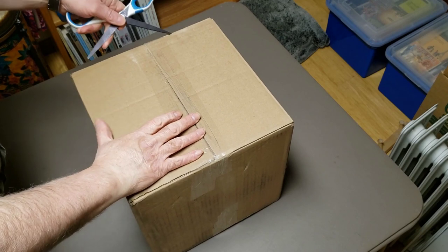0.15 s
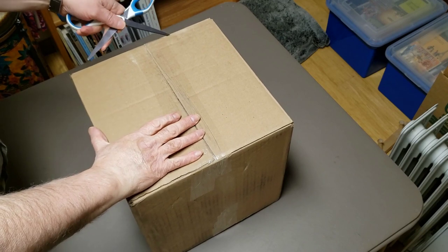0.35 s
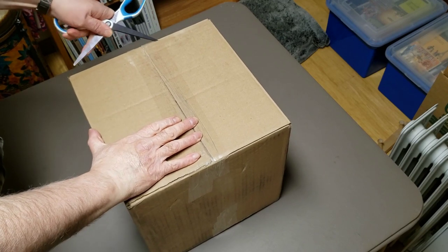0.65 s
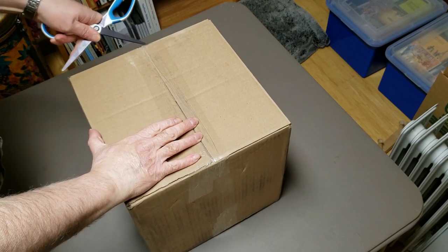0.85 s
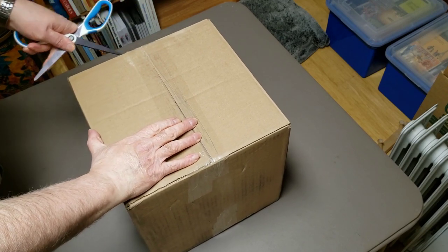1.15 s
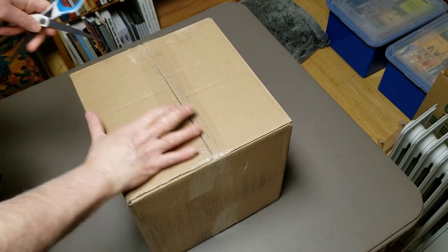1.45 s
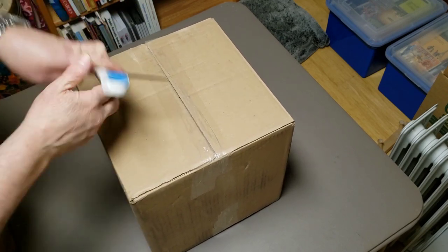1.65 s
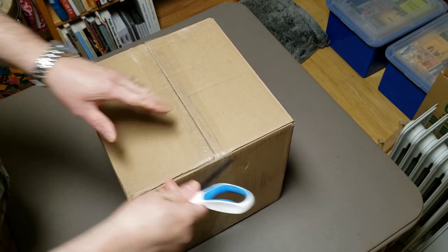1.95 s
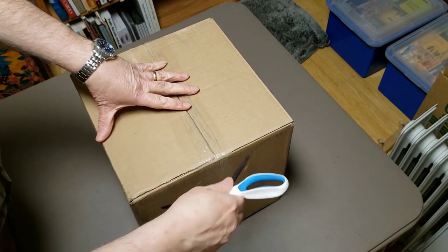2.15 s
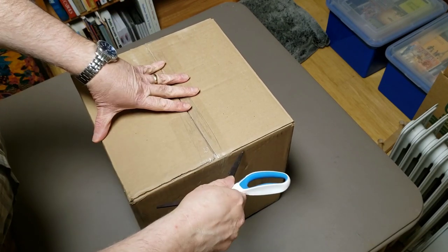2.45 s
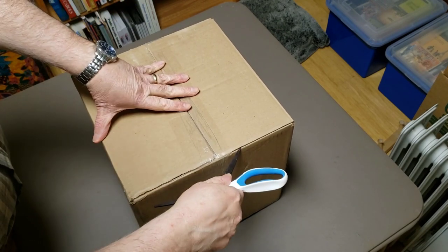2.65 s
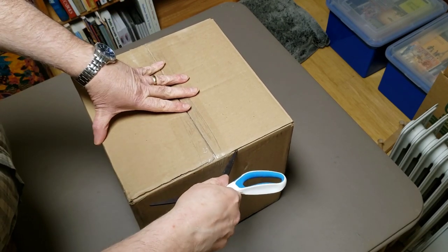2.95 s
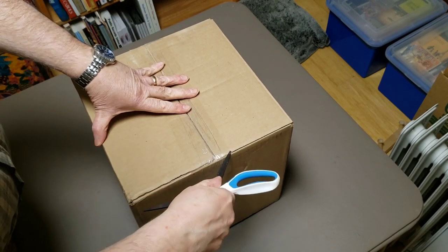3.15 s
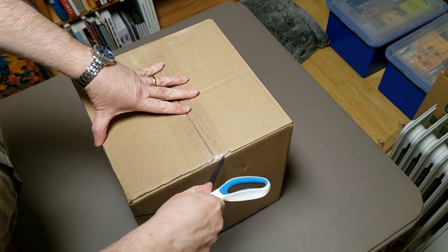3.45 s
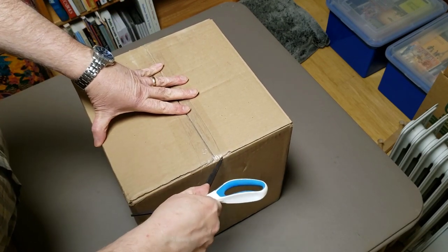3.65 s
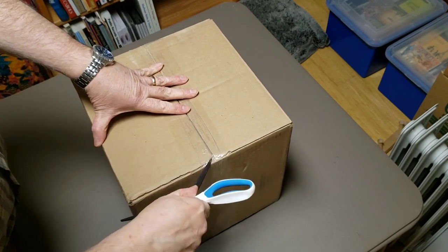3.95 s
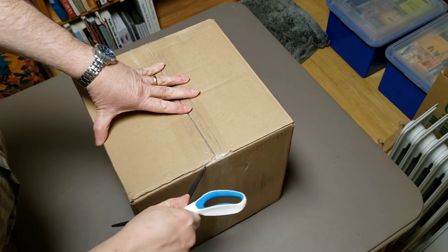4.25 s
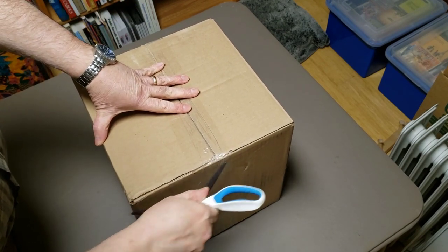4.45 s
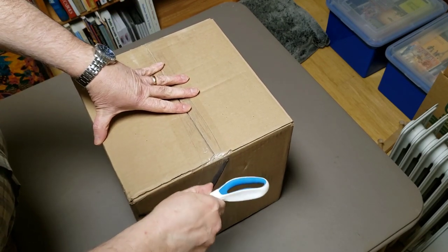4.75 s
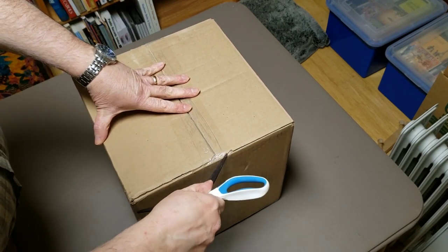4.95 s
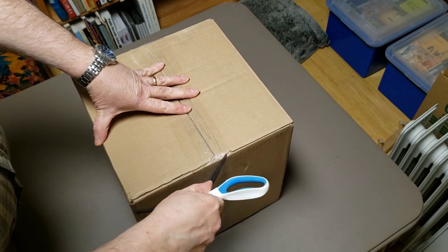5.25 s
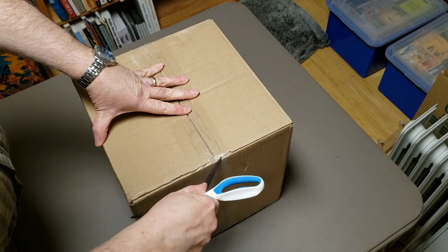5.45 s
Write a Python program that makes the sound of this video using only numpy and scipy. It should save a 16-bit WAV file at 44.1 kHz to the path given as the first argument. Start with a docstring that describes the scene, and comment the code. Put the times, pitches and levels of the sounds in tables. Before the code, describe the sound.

Soft rubbing on a carton comes first, then a dense second of dry scraping, crackling tape and hollow knocks. A bright metal scissor tick follows, and a few small rattles as hands change position. Afterwards come sparser, mostly quieter scrapes and low bumps against the front wall, a stronger thud midway, and a final crack. Near stereo microphones, short indoor reflections, light hiss.

```python
"""Soft rubbing on a cardboard box over room hiss comes first; then a scissor blade slits the box's tape.
The tape rips and snaps and the blade scrapes the board: uneven noise impulses ring tape, fibres and flaps.
Pushes, knocks and a slap of the hand make the hollow walls boom and the box rock, through sets of resonances.
The loose scissor halves tick and rattle, and a small furnished room answers all of it in stereo."""
import sys
import numpy as np
from scipy import signal
from scipy.fft import rfft, irfft, next_fast_len
from scipy.io import wavfile
from scipy.ndimage import uniform_filter1d, map_coordinates

SR = 44100
rng = np.random.default_rng(int(sys.argv[2]) if len(sys.argv) > 2 else 0)


def digitize_waveform(pressure):
    """Quantize a signal to 16-bit integers and store it at the path in sys.argv[1].

    Rows of a 2-D input are taken as channels; values are limited to [-1, 1].
    """
    field = np.atleast_2d(pressure).T
    bounded = np.clip(field, -1, 1)
    quanta = np.round(bounded * 32767).astype(np.int16)
    wavfile.write(sys.argv[1], SR, quanta)


def magnitude_from_level(level_db):
    """Linear magnitude for a level in decibels (20 dB per decade)."""
    exponent = np.asarray(level_db, float) / 20
    return 10 ** exponent


N = 247401


def unit(x):
    """Scaled to rms 1."""
    return x / np.sqrt(np.mean(x ** 2) + 1e-20)


def along(points, hz, column=1):
    """A column of (frequency, value, ..) points, interpolated on a log frequency axis."""
    table = np.transpose(points)
    return np.interp(np.log(hz + 1), np.log(table[0] + 1), table[column])


def filtered(x, response):
    """x times a complex response of frequency."""
    size = next_fast_len(N + SR // 2)  # spare room so that tails do not wrap round
    spectrum = rfft(x, size) * response(np.fft.rfftfreq(size, 1 / SR))
    return irfft(spectrum, size)[..., :N]


def modes(table):
    """Causal response of a set of resonances, each a damped mass on a spring."""
    def response(hz):
        total = 0
        for k, (centre, width, db) in enumerate(table):
            damping = 1j * hz * width
            resonance = damping / (centre ** 2 - hz ** 2 + damping)
            total = total + (-1) ** k * magnitude_from_level(db) * resonance  # neighbours swing in opposite phase
        return total
    return response


def causal(spectrum):
    """Minimum-phase response of (frequency, level) points, so that clicks do not ring early."""
    def response(hz):
        cepstrum = irfft(np.log(magnitude_from_level(along(spectrum, hz)) + 1e-6))
        half = len(cepstrum) // 2
        cepstrum[1:half] *= 2  # fold the early half onto the late half
        cepstrum[half + 1:] = 0
        return np.exp(rfft(cepstrum))
    return response


def scaled(response, force, gain):
    """The force, shaped in time by gain, rings the body; a steady force comes out at rms 1."""
    return filtered(force * gain, response) / filtered(force, response).std()


def pair(a, b, alike):
    """Left and right as sum and difference of two unrelated sounds, mixed to the given likeness."""
    def mid_side(hz):
        turn = np.arccos(np.clip(along(alike, hz), -1, 1)) / 2
        return np.array([np.cos(turn), np.sin(turn)])
    mid, side = filtered(np.array([a, b]), mid_side)
    return np.array([mid + side, mid - side])


# hiss spectrum: (frequency [Hz], level per Hz [dB])
HISS_COLOUR = [(15, -41), (25, 12), (111, 6), (457, 0), (510, 0), (584, -2.5), (1120, -6), (1320, -6),
               (1430, -6), (2980, -9.5), (9580, -22), (14800, -6), (16500, -28)]
# left-right likeness of the hiss: (frequency [Hz], likeness [-1..1])
HISS_LIKENESS = [(60, 0.41), (240, 0.37), (950, 0.049), (3770, -0.046), (15000, 0.26)]


def hiss():
    """Steady air and microphone noise: coloured random noise, partly shared by left and right."""
    noise = filtered(rng.standard_normal((2, N)), lambda hz: magnitude_from_level(along(HISS_COLOUR, hz)))
    return magnitude_from_level(-66.5) * unit(pair(*noise, HISS_LIKENESS))


# room echo: (frequency [Hz], time to fall 60 dB [s], level [dB])
ROOM_ECHO = [(99, 0.17, -12.5), (497, 0.21, -6), (1510, 0.32, -8), (3980, 0.28, -9), (9430, 0.27, -5.5),
             (14530, 0.32, -6)]


def room(x):
    """Diffuse answer of the room, unlike in each ear; the tail is redrawn at random every quarter second."""
    out, step = np.zeros((2, N + SR)), SR // 4
    for start in range(0, N, step):
        hz, t, z = signal.stft(rng.standard_normal((2, SR // 2)), SR, nperseg=256)
        decay = magnitude_from_level(-60 * t / along(ROOM_ECHO, hz)[:, None])
        tail = signal.istft(z * decay, SR, nperseg=256)[1][:, :SR // 2]
        tail = tail / np.linalg.norm(tail[0])
        wet = signal.fftconvolve(x[None, start:start + step], tail, axes=1)
        out[:, start + 250:][:, :wet.shape[1]] += wet  # first walls answer after 6 ms
    return filtered(out[:, :N], lambda hz: magnitude_from_level(along(ROOM_ECHO, hz, column=2)))


def scattered(x):
    """The sound by a few ms of other paths over box and table, redrawn at random every twentieth of a second."""
    out, step, t = np.zeros(N + SR), SR // 20, np.arange(256) / SR
    for start in range(0, N, step):
        paths = rng.standard_normal(len(t)) * magnitude_from_level(-60 * t / 0.0023)
        heard = np.convolve(x[start:start + step], paths / np.linalg.norm(paths))
        out[start:][:len(heard)] += heard
    return out[:N]


# ticks of the scissor halves, and bright clicks as the hand slaps the box:
# (time [s], level [dB], rattle after it [dB])
BRIGHT_TICKS = [(0.2208, -42.5, -5.5), (1.528, -20, -24.5), (1.5333, -28, -22), (1.536, -32, -28),
                (1.54, -39, -20), (1.5453, -32, -30), (1.553, -41, -18), (1.5645, -35, -27.5),
                (1.7704, -38, -5), (1.7756, -51, -9), (2.1684, -28.5, -9), (2.1757, -35.5, -4.5),
                (2.2044, -50, -21)]
# resonances a tick rings with: (frequency [Hz], width [Hz], level [dB])
TICK_MODES = [(4350, 3600, -9.5), (5980, 1300, -4), (9750, 1300, 0.5), (11730, 3150, -1), (15100, 1600, -9)]


def ticks():
    """A hard touch of about a millisecond, then a fine rattle, rings a set of treble resonances."""
    force, t = np.zeros(N), np.arange(SR // 5) / SR
    for s, db, rattle_db in BRIGHT_TICKS:
        contact = magnitude_from_level(5.5 - 60 * t / 0.0011)
        rattle = magnitude_from_level(rattle_db - 60 * t / 0.36)
        force[round(s * SR):][:len(t)] += magnitude_from_level(db) * (contact + rattle) * rng.standard_normal(len(t))
    return filtered(force, modes(TICK_MODES))


FRONT_S = 2.3  # from here on the blade works at the front wall


def pushed(table, s):
    """(frequency, width, level) of box modes for a push at time s: on the lid, later on the front wall."""
    return [(hz, width, front_db if s > FRONT_S else lid_db) for hz, width, lid_db, front_db in table]


def ringing(table, t):
    """Decaying sines of a struck body; each blow lands at a new spot, so the modes change strength."""
    total = 0
    for k, (hz, width, db) in enumerate(table):
        strength = (-1) ** k * magnitude_from_level(db + rng.normal(0, 3))
        total = total + strength * np.exp(-np.pi * width * t) * np.sin(2 * np.pi * hz * t)
    return total


# knocks on the box: (time [s], level [dB], flap ring [dB])
BOX_KNOCKS = [(0.451, -30, -7), (0.648, -38, -6), (0.69, -25.5, -7.5), (0.742, -22.5, -22),
              (0.823, -25, -17), (0.901, -32, -2), (1.156, -22.5, -3.5), (1.257, -27.5, -10),
              (1.281, -30, -23), (2.155, -42, -13), (2.166, -32, -24), (2.326, -41, -17), (2.623, -58, -23),
              (3.042, -30.5, -17), (3.415, -33, -21.5), (3.711, -43, -18), (3.739, -30, -17),
              (3.773, -22, -22), (3.851, -47.5, -10), (4.183, -48, -25), (4.657, -43.5, -10.5),
              (4.825, -48, 2.5), (4.998, -42, -23), (5.346, -45, -28), (5.435, -29, -25),
              (5.486, -33.5, -27), (5.54, -28, -29), (5.606, -27.5, -3)]
# slow modes of the loaded box on its table:
# (frequency [Hz], width [Hz], level for a lid push [dB], level for a front wall push [dB])
ROCK_MODES = [(46.8, 6.7, -9, -3), (64.7, 10.1, -6.5, 0.5), (87.8, 9.5, 1, -1.5), (124.6, 17, -11.5, -4),
              (151.7, 16.4, -4, -5.5)]
# wall modes of the hollow box:
# (frequency [Hz], width [Hz], level for a lid push [dB], level for a front wall push [dB])
WALL_MODES = [(192.3, 45, -5.5, -8), (230, 22, -2, 2), (263.5, 18.3, -4.5, -4), (292.7, 14.6, 0, -7.5),
              (356.4, 21.6, 0, -4), (369.8, 30.2, -4, -8), (429, 78, -6.5, -17.5), (502, 46, -8, -15),
              (570, 41, -10.5, -14)]
# flap resonances rung by the blade: (frequency [Hz], width [Hz], level [dB])
FLAP_MODES = [(729.8, 59, 1.5), (865, 93, -1), (973, 73, -3), (1054, 83, -2), (1138, 110, -3),
              (1288, 180, -5.5), (1502, 157, -6), (1760, 173, -8), (1980, 134, -17), (2350, 250, -15)]


def knocks():
    """Each blow rings walls and flaps and rocks the box through their decaying resonances."""
    out, t = np.zeros(N + SR), np.arange(SR // 3) / SR
    held = 0.37 + 1.4 * np.exp(-t / 0.0071)  # the hand on the box soon damps the first swings
    slow_start = 1 - np.exp(-t / 0.0023)  # the mass of the box is slow to start
    contact = 1 - np.exp(-t / 0.00041)
    for s, db, flap_db in BOX_KNOCKS:
        walls = held * ringing(pushed(WALL_MODES, s), t)
        rocking = magnitude_from_level(-5) * ringing(pushed(ROCK_MODES, s), t) * slow_start
        flaps = magnitude_from_level(flap_db) * ringing(FLAP_MODES, t)
        out[round(s * SR):][:len(t)] += magnitude_from_level(db - 4) * (walls + rocking + flaps) * contact
    return out[:N]


def slips(spread_db, clump_db, clumps):
    """Stick-slip force of rms 1: impulses of very uneven size that come in clumps (clumps a second)."""
    size_db = spread_db * rng.exponential(size=N)
    swell = map_coordinates(rng.standard_normal(N // 20), [np.arange(N) * min(clumps, 2000) / SR])
    return unit(rng.standard_normal(N) * magnitude_from_level(size_db + clump_db * swell))


def movements(sudden, rise_ms, gradual):
    """Sudden movements share one rise time; all in rows of one form."""
    return [(s, rise_ms, *rest) for s, *rest in sudden] + gradual


def effort(table, column, t60_s):
    """Gain per sample: each movement grows tenfold in its rise time, holds and fades; powers add."""
    t, power = np.arange(N) / SR, 0
    for row in table:
        s, rise_ms, hold_s = row[:3]
        early_ms = 1000 * np.maximum(s - t, 0)
        late_s = np.maximum(t - s - hold_s, 0)
        power = power + magnitude_from_level(2 * row[column]) * 1e-6 ** (early_ms / (3 * rise_ms) + late_s / t60_s)
    return np.sqrt(power)


def sticking(events, hold_s, depth_db):
    """The blade catches and its force eases just before each event."""
    t = np.arange(N) / SR
    ahead = np.array([row[0] for row in events] + [np.inf])
    wait = ahead[np.searchsorted(ahead, t)] - t
    return magnitude_from_level(-depth_db * np.exp(-wait / hold_s))


def shaken(table, force, gain):
    """Box modes under a force that moves from the lid to the front wall."""
    front = np.arange(N) > FRONT_S * SR
    lid_part = scaled(modes(pushed(table, 0)), force, gain * ~front)
    front_part = scaled(modes(pushed(table, N / SR)), force, gain * front)
    return lid_part + front_part


# sudden jolts of hand or blade on the box: (time [s], hold [s], walls [dB], rocking [dB])
BOX_JOLTS = [(0.452, 0.033, -44, -72), (0.655, 0.027, -44.5, -46), (0.692, 0.021, -38, -55),
             (0.745, 0.0375, -41.5, -33.5), (0.825, .03, -37, -31.5), (0.905, 0.085, -40, -37.5),
             (1.158, 0.047, -36.5, -30.5), (1.26, 0.024, -35, -31), (1.78, 0.028, -63, -74.5),
             (2.16, 0.041, -46, -49), (2.332, 0.0557, -62, -48), (2.625, 0.014, -72, -61.5),
             (3.235, 0.13, -48.5, -54.5), (3.415, 0.025, -44, -48.5), (3.712, 0.035, -43.5, -52),
             (4.185, 0.086, -59, -59), (4.658, 0.11, -57.5, -50.5), (4.827, 0.017, -47, -58),
             (5.0, 0.025, -57, -50), (5.347, 0.11, -57.5, -62), (5.435, 0.208, -46, -47.5)]
# the hand leans on the box or rubs it:
# (time of full strength [s], rise [ms], hold [s], walls [dB], rocking [dB])
HAND_LEANS = [(0.058, 82, 0.048, -64, -52), (0.221, 68, 0.027, -65.5, -67), (0.35, 32, 0.034, -72, -74),
              (0.417, 34, .01, -57, -55), (0.49, 49, 0.051, -39.5, -44.5), (0.997, 50, 0.12, -39.5, -35.5),
              (1.292, 40, 0.063, -35, -38.5), (1.411, 40, 0.062, -49, -54), (2.42, 30, 0.021, -62, -58),
              (2.494, 30, 0.023, -64.5, -65), (2.951, 54, 0.062, -53.5, -55.5),
              (3.042, 83, 0.087, -41, -47), (3.767, 40, 0.018, -32.5, -30.5), (3.834, 22, 0.0076, -59, -57),
              (3.936, 50, 0.021, -77, -60), (4.127, 65, .03, -66, -68), (4.35, 76, 0.022, -66, -62)]


def pushing():
    """Stick-slip pushes of hand and blade rock the box and shake its walls."""
    pushes = movements(BOX_JOLTS, 8, HAND_LEANS)  # jolts rise in 8 ms
    brace = sticking(BOX_KNOCKS, 0.028, depth_db=1.5)
    rock_force = slips(3.44, clump_db=0.5, clumps=55)
    wall_force = slips(2.65, clump_db=2.0, clumps=60)
    rock = shaken(ROCK_MODES, rock_force, effort(pushes, column=4, t60_s=0.3))
    walls = shaken(WALL_MODES, wall_force, effort(pushes, column=3, t60_s=0.22) * brace)
    return magnitude_from_level(-0.5) * (rock + walls)


def shifting(x, depth_db):
    """The contact point travels, so the colour of the scrape keeps changing in patches."""
    z = signal.stft(x, nperseg=256)[2]
    field = uniform_filter1d(rng.standard_normal(z.shape), size=3, axis=0)
    field = uniform_filter1d(field, size=14, axis=1)
    return unit(signal.istft(z * magnitude_from_level(depth_db * unit(field)), nperseg=256)[1][:N])


# tape snaps: (time [s], level [dB], fibre rasp [dB])
TAPE_SNAPS = [(0.413, -48, -18), (0.4464, -37, -9), (0.6514, -38, -14), (0.6883, -20, -7.5),
              (0.7397, -26, -1.5), (0.821, -20.5, -12.5), (0.9028, -22, -13), (0.9951, -29, -3.5),
              (1.1418, -22, -12.5), (1.1538, -26.5, -7.5), (1.254, -27, -5), (2.1655, -32, -4.5),
              (2.3226, -47, -14), (2.4952, -52, -9), (3.039, -35, -11), (3.0684, -35, -10),
              (3.2316, -45, -12), (3.71, -40.5, -10), (3.7399, -31, -11), (3.7614, -30.5, -21),
              (4.8234, -51, -6), (4.9926, -54, -10), (5.4321, -43.5, -4.5), (5.6064, -17.5, -17.5)]
# tape crackle as the microphone colours it: (frequency [Hz], level per Hz [dB])
TAPE_COLOUR = [(6500, -42.5), (8000, -15.5), (9000, -1.5), (10000, 3), (11700, 1), (13500, -6), (15600, -6),
               (16500, -92)]
# torn fibres as the microphone colours them: (frequency [Hz], level per Hz [dB])
FIBRE_COLOUR = [(1200, -18), (1900, -3), (2300, -6.5), (2900, -3), (3500, -3.5), (4300, -3), (5500, -5),
                (6800, -6.5), (7900, -15.5), (9500, -39.5)]


def snaps():
    """Tape lets go with a crack, then crackles as the tear runs on; fibres and flaps ring with it."""
    force, t = np.zeros((3, N + SR)), np.arange(SR // 5) / SR
    crack = magnitude_from_level(-60 * t / 0.0014)
    crackle = magnitude_from_level(-13 - 60 * t / 0.12)
    for s, db, rasp_db in TAPE_SNAPS:
        burst = (crack + crackle) * rng.standard_normal((3, len(t)))
        shares_db = np.array([[0], [rasp_db], [-3]])  # tape, fibres, flaps
        force[:, round(s * SR):][:, :len(t)] += magnitude_from_level(db + shares_db) * burst
    tape, fibres, flaps = force[:, :N]
    tape = magnitude_from_level(3) * filtered(tape, causal(TAPE_COLOUR))
    fibres = magnitude_from_level(12.5) * filtered(fibres, causal(FIBRE_COLOUR))
    return tape + fibres + magnitude_from_level(14) * filtered(flaps, modes(FLAP_MODES))


# sudden bites of the blade, and a slap of the hand on the lid:
# (time [s], hold [s], tape [dB], board [dB], fibres over board [dB])
BITES_AND_SLAP = [(0.415, .025, -58, -59.5, -6), (0.445, 0.0087, -55.5, -53.5, -10),
                  (0.656, 0.013, -49, -49.5, -2), (0.689, 0.011, -40, -38.5, -1.5),
                  (0.739, 0.033, -40, -38, -2), (0.818, 0.016, -43.5, -36, -2.5),
                  (0.9, 0.035, -42, -43.5, 0), (1.148, .01, -40.5, -48, -1), (1.156, .03, -39, -38.5, -1.5),
                  (1.252, 0.015, -37.5, -42, -2), (2.167, .04, -61.5, -54, 4),
                  (2.32, 0.019, -71, -69.5, -8), (2.447, 0.016, -76, -83, -4), (2.5, .03, -68, -81, -1),
                  (3.038, 0.019, -52, -54, -6.5), (3.229, .03, -53, -67.5, -2.5),
                  (3.708, 0.025, -52, -57, -0.5), (3.742, 0.034, -49, -45, -4),
                  (4.112, 0.049, -70, -75, -4), (4.167, 0.0206, -68.5, -79, 4),
                  (4.664, .012, -78, -69.5, -14), (4.995, 0.009, -72, -79, -7),
                  (5.432, 0.025, -56, -58, -6), (5.607, .012, -44, -39, -10)]
# slides of blade or hand over tape and board:
# (time of full strength [s], rise [ms], hold [s], tape [dB], board [dB])
BLADE_SLIDES = [(0.075, 115, 0.038, -61, -66), (0.137, 50, 0.033, -68, -70.5),
                (0.343, 22, 0.0081, -84, -69), (0.522, 116, 0.03, -52, -50.5), (0.597, 50, 0.037, -62, -58),
                (1.002, 150, 0.0088, -43, -42.5), (1.055, 44, 0.027, -44, -41),
                (1.303, 85, 0.05, -35.5, -32.5), (1.44, 27, 0.048, -54.5, -58),
                (3.085, 67, 0.031, -47.5, -51), (3.414, 105, 0.022, -60.5, -66),
                (4.288, 120, 0.061, -70, -75), (4.744, 25, 0.0224, -68.5, -74),
                (4.821, 28, 0.0051, -58, -62.5), (5.499, 76, 0.13, -61.5, -69.5),
                (5.582, 28, .02, -59, -62.5)]
BITE_RISE_MS = 4


def fibre_rasp():
    """Rows (time, rise, hold, level) of fibre rasp: sudden rows have their own share, slides follow the board."""
    rows = [(s, BITE_RISE_MS, hold_s, board_db + over_db)
            for s, hold_s, _, board_db, over_db in BITES_AND_SLAP]
    for s, rise_ms, hold_s, _, board_db in BLADE_SLIDES:
        over_db = -4.5 if s > FRONT_S else -2.5
        rows.append((s, rise_ms, hold_s, board_db + over_db))
    return rows


def cutting():
    """Blade and hand rasp on the flaps, fibres and tape, by stick-slip."""
    scraping = shifting(slips(2.374, clump_db=3.0, clumps=100), depth_db=3.5)
    tearing = shifting(slips(2.03, clump_db=2, clumps=150), depth_db=2.0)
    slides = movements(BITES_AND_SLAP, BITE_RISE_MS, BLADE_SLIDES)
    t60_s = 0.23  # how fast a movement dies away
    flaps = scaled(modes(FLAP_MODES), scraping, effort(slides, column=4, t60_s=t60_s))
    fibres = scaled(causal(FIBRE_COLOUR), tearing, effort(fibre_rasp(), column=3, t60_s=t60_s))
    tape = scaled(causal(TAPE_COLOUR), tearing, effort(slides, column=3, t60_s=t60_s))
    return magnitude_from_level(-0.5) * (flaps + fibres + tape)


# left-right likeness of the direct sound, joined at the very top: (frequency [Hz], likeness [-1..1])
DIRECT_LIKENESS = [(60, 0.77), (150, 0.998), (350, 0.99), (700, 0.59), (1100, 0.24), (1800, 0.05),
                   (3000, -0.19), (4500, -0.13), (7000, -0.28), (9000, -0.053), (11000, 0.41), (15000, 1)]
# bass balance of left and right: (frequency [Hz], left minus right [dB])
BASS_BALANCE = [(60, 1.5), (130, .5), (500, .7)]
# balance of the two ports by frequency, left louder near 7 kHz, right louder above 9 kHz:
# (frequency [Hz], left minus right [dB])
UPPER_BALANCE = [(1000, 2), (1700, -2), (3000, 2), (4200, -1), (6200, 3), (7300, 6.5), (9000, -9),
                 (10500, -7.5), (12400, -8.5), (15000, -4.5)]


def scene():
    """The box reaches two microphone ports directly and by way of the room, over steady hiss."""
    box = ticks() + knocks() + pushing() + snaps() + cutting()
    heard = pair(box, scattered(box), DIRECT_LIKENESS) + room(box)
    halves = np.array([[0.5], [-0.5]])  # each port takes half of the difference
    balance = [*BASS_BALANCE, *UPPER_BALANCE]
    return filtered(heard, lambda hz: magnitude_from_level(halves * along(balance, hz))) + hiss()


def roll_off(x):
    """The treble ends steeply here."""
    return signal.sosfilt(signal.butter(12, 16830, fs=SR, output="sos"), x)


def record(dry):
    """The small microphones lose the deepest bass: two first-order low cuts in a row."""
    low_hz = 35
    thin = filtered(dry, lambda hz: (1j * hz / (low_hz + 1j * hz)) ** 2)
    return roll_off(thin)


dry = scene()
out = record(dry)
digitize_waveform(out)
```